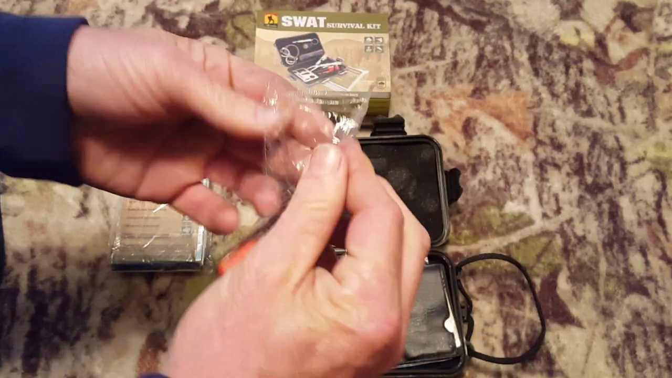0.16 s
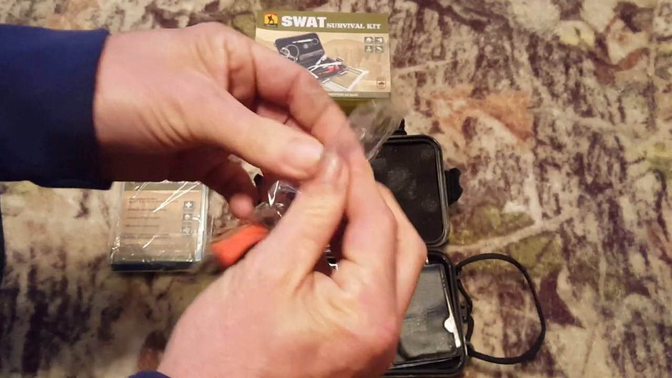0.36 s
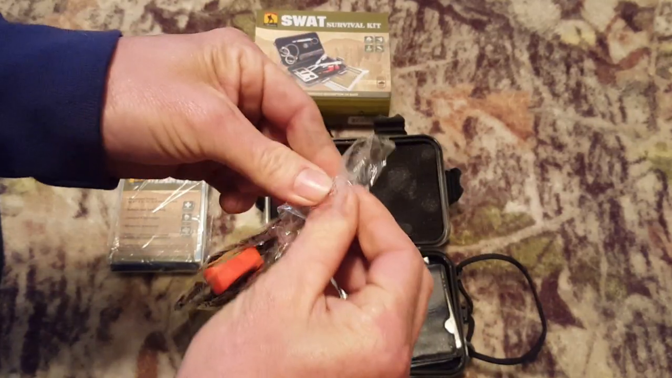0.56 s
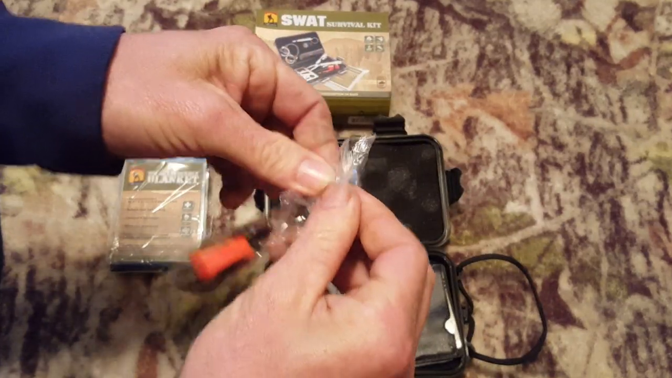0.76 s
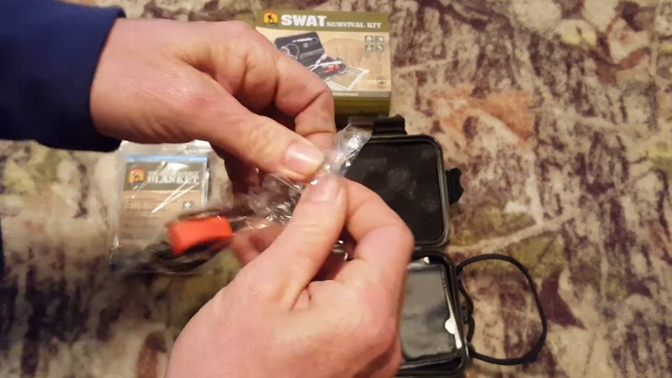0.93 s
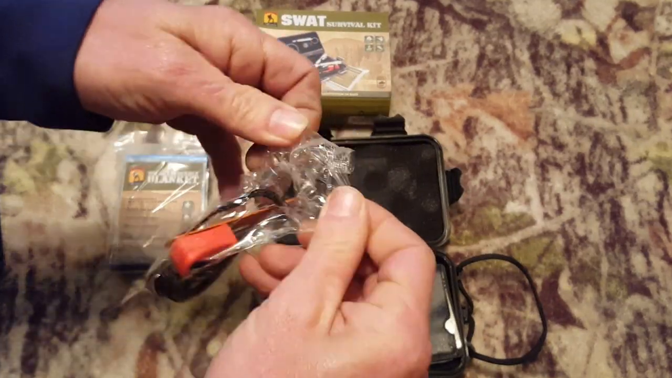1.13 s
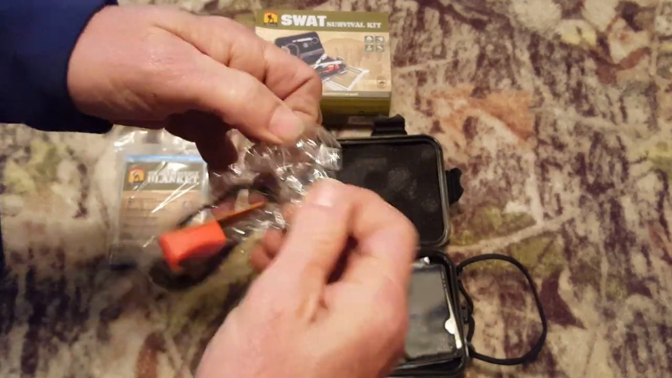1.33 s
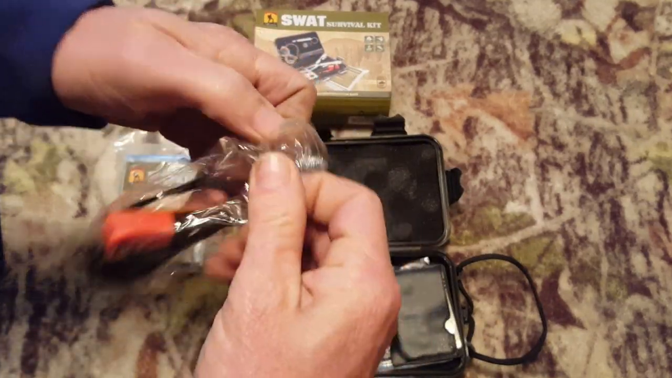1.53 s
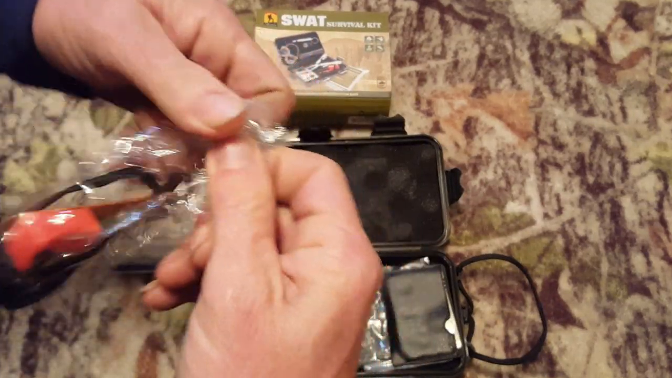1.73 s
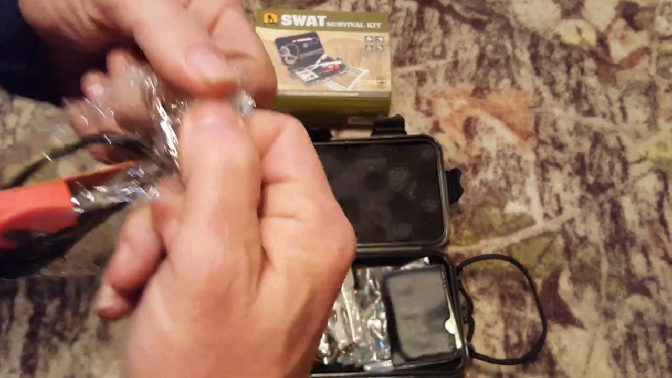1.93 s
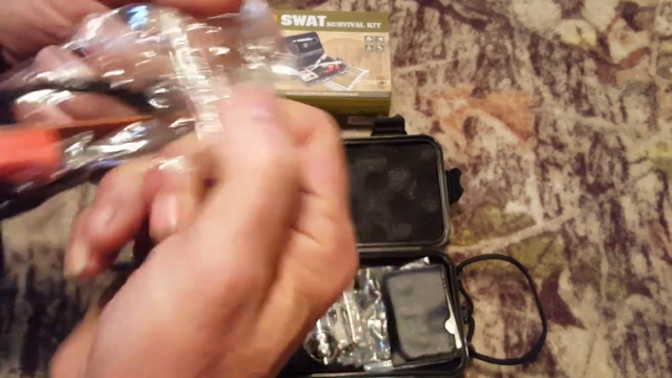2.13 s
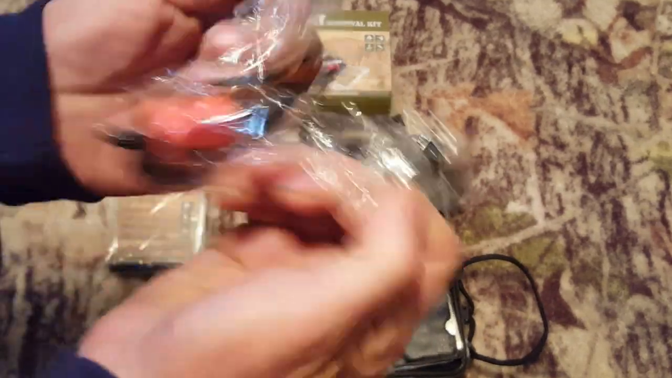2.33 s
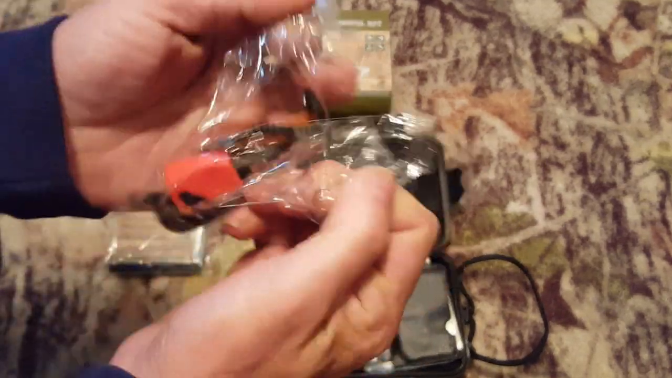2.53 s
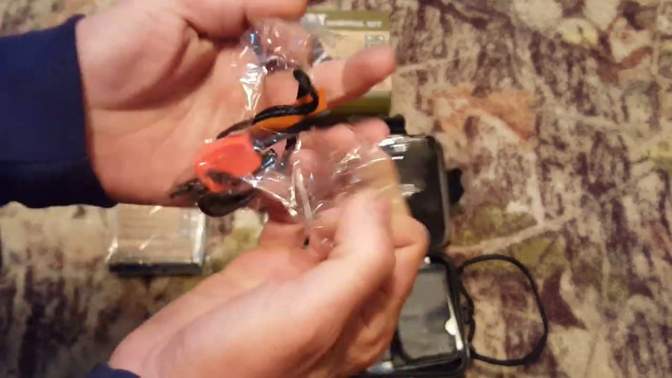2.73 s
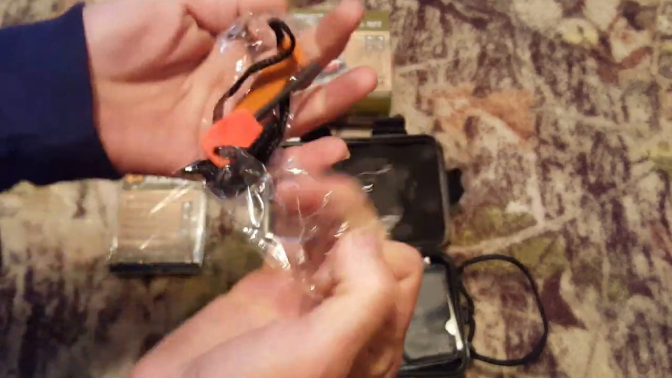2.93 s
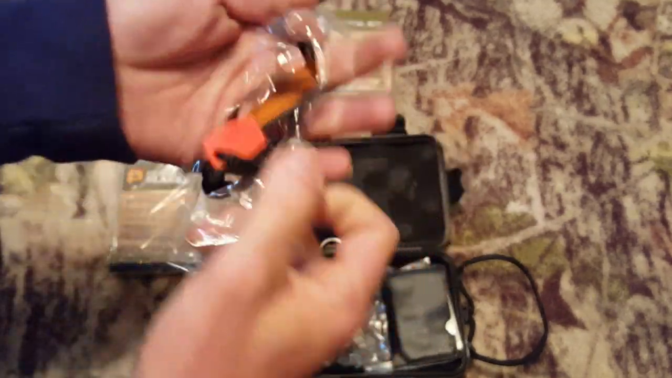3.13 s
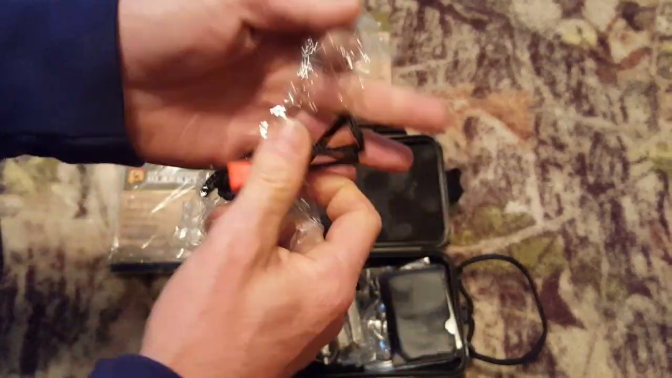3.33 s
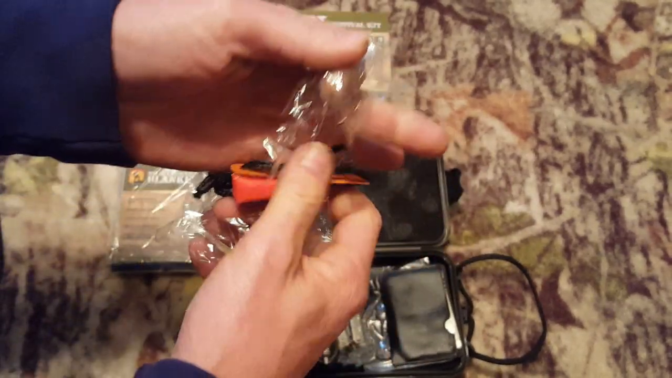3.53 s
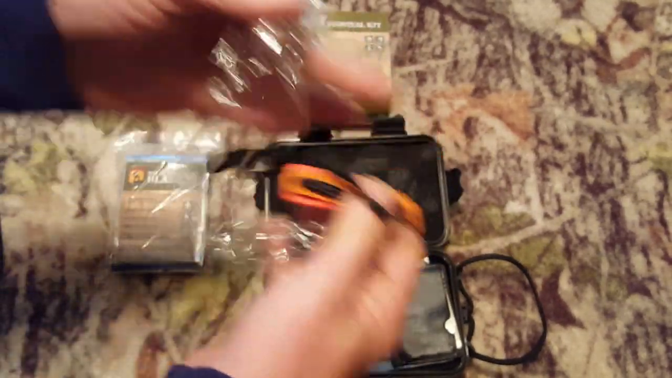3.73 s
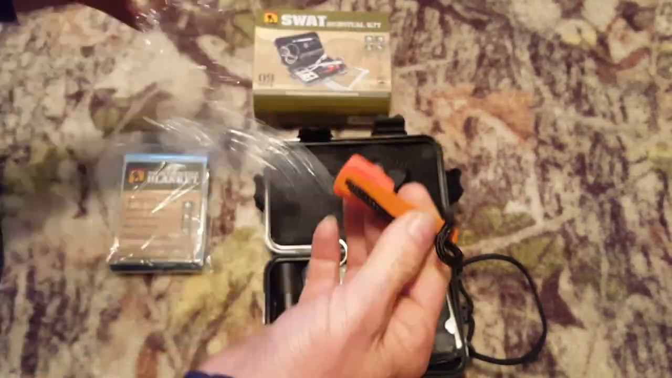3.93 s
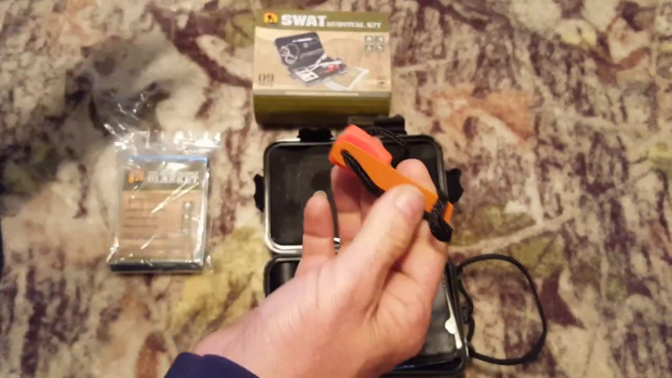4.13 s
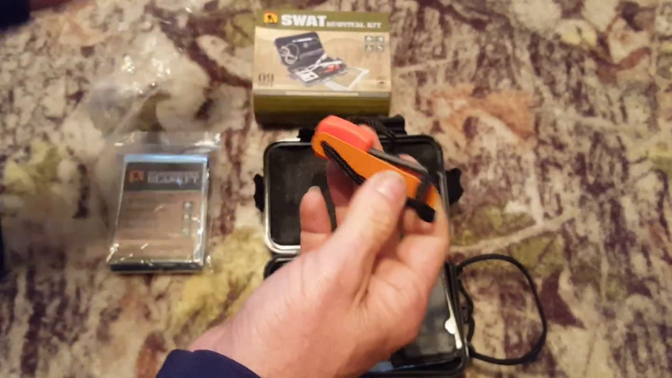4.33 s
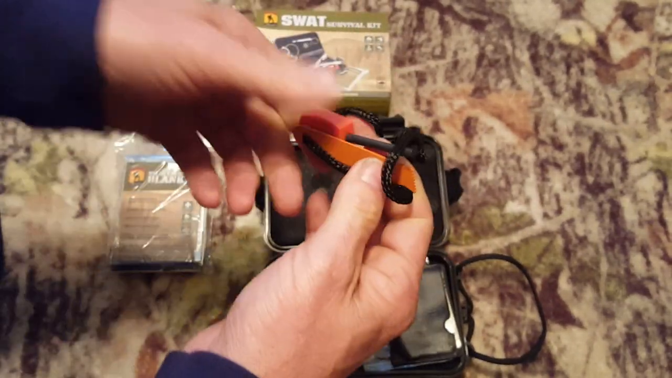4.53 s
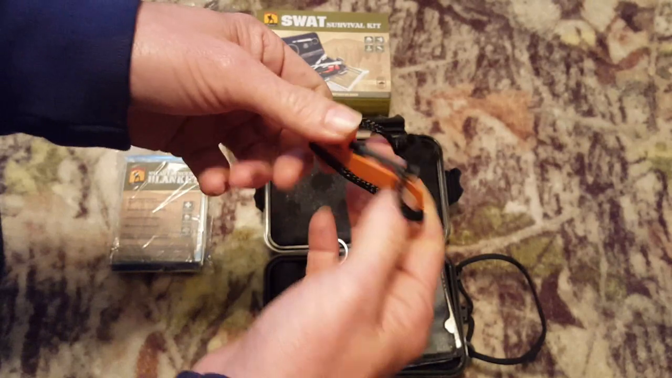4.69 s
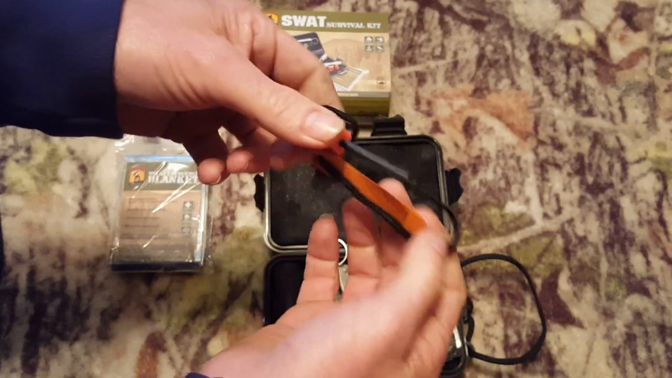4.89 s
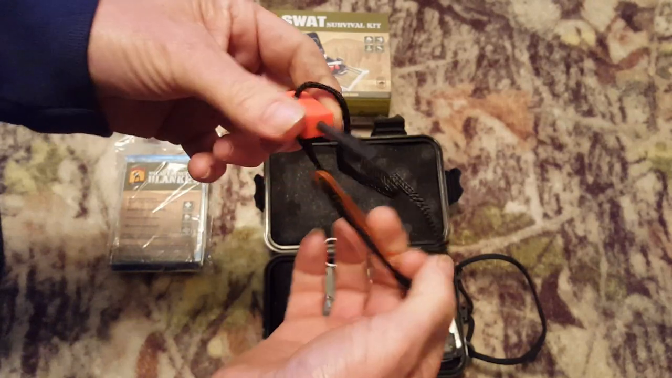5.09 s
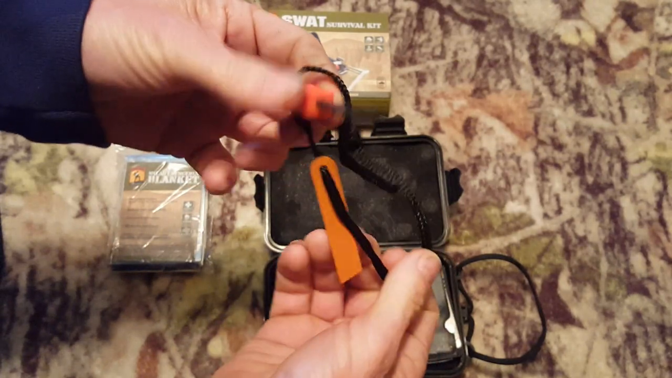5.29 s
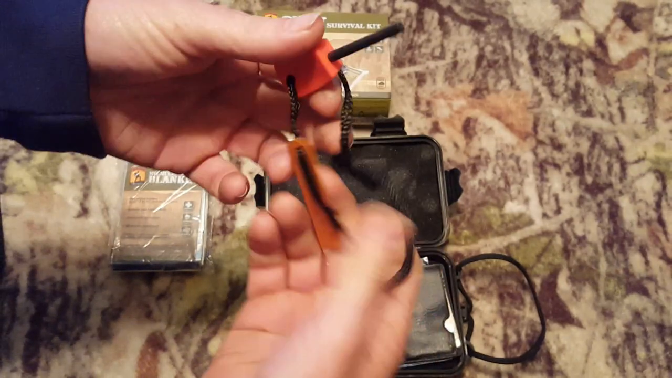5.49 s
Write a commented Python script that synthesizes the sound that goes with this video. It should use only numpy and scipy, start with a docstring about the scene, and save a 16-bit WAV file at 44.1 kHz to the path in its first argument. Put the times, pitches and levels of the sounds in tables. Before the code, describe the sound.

Two hands peel a crinkly clear wrapper from a small plastic tool with a cord, close to the microphone and slightly left. Bright irregular crackling comes in bursts with brief pauses, short sizzling peels and a hard knock past two seconds. Looser rustling follows, then, from about four seconds, quiet tapping, faint rubbing and a soft table bump in a small dry room.

```python
"""Thin clear plastic crackles at once, close by in a quiet room: two hands work a wrapper off a small corded tool.
Creases buckle in swarms of tiny ringing clicks and louder single snaps; film hisses as it slides on film.
Peeling film sizzles with a gliding pitch, and fingers knock on the contents as short damped resonances.
After four seconds the wrapper is dropped; light ticks, soft scuffs and a dull bump follow as the tool is turned.
Diffuse reflections and a faint filtered hiss make up the room."""
import sys
import numpy as np
from scipy import signal
from scipy.fft import rfft, irfft
from scipy.io import wavfile
from scipy.ndimage import uniform_filter1d

SR = 44100
rng = np.random.default_rng(int(sys.argv[2]) if len(sys.argv) > 2 else 0)


def put_to_file(sound):
    """Save the sound as 16-bit audio at rate SR, in the file named by the first command-line argument."""
    columns = np.atleast_2d(sound).T  # one column per channel
    safe = np.clip(columns, -1, 1)
    whole_steps = np.round(safe * 32767)
    wavfile.write(sys.argv[1], SR, whole_steps.astype(np.int16))


N = 244755
TIME = np.arange(N) / SR

# colour of the room's air and hiss: (frequency [Hz], level [dB])
AIR_COLOUR = [(18, -31), (30, 1.5), (53, -13), (118, -4), (266, -14), (426, -12.5), (988, -22.5),
              (1350, -20.5), (4530, -28), (8300, -30), (10200, -32), (14800, -30), (16000, -53)]
# colour of the room's reflections: (frequency [Hz], level [dB])
ROOM_COLOUR = [(100, 2), (500, -8), (2000, 4), (7000, -2), (10000, -6.5), (16000, -2)]
# dull bumps of an arm on the table: (time [s], peak level [dB], pitch [Hz])
BUMPS = [(.56, -54, 107), (3.915, -48, 106), (5.34, -53, 160), (5.358, -44.5, 106)]
# a fingertip or the cord scuffs the tool: (time [s], level [dB], decay [s], ring [Hz])
SCUFFS = [(4.459, -65, 0.016, 7400), (4.49, -57, 0.02, 3400), (4.681, -58.5, 0.027, 2500),
          (4.93, -74, 0.11, 8520), (5.092, -48, 0.022, 760), (5.26, -71.5, 0.078, 8040),
          (5.507, -72, .05, 8040)]
# light ticks of the tool, its cord and the settling wrapper, level before a shared gain:
# (time [s], level over 2 ms [dB], ring [Hz], share of the low thud [dB])
TICKS = [(4.0411, -37, 7800, -14), (4.0761, -39, 7200, -6), (4.0943, -43, 2400, -4.5),
         (4.1619, -40.5, 5670, -10), (4.2275, -45, 7200, -9), (4.2326, -49, 3100, 0),
         (4.2548, -51.5, 7800, -3), (4.3179, -42.5, 6100, -14), (4.3737, -44, 1960, -12),
         (4.3874, -50, 7700, -13), (4.4572, -38.5, 8100, -5.5), (4.4878, -41.5, 3480, -20),
         (4.6807, -44.5, 2680, -9.5), (4.7981, -54, 2130, -11.5), (5.0929, -44.5, 7600, -3.5),
         (5.2069, -59, 3970, -10.5), (5.3699, -56, 8750, -7.5), (5.5096, -56, 8960, -3)]
# fingers knock on the wrapped tool or jerk the film taut: (time [s], peak level [dB], resonance [Hz])
KNOCKS = [(.114, -24.5, 960), (1.27, -43, 252), (1.454, -32, 370), (1.679, -40, 298), (1.723, -18.5, 1410),
          (2.184, -26.5, 280), (2.314, -25, 300), (2.315, -27.5, 110), (2.367, -6.5, 1934),
          (2.385, -20.5, 1100), (3.576, -33.5, 330)]
# stretched film peels apart in fast slips, level before a shared gain and rates before they waver:
# (time [s], length [s], level [dB], first slip rate [Hz], last slip rate [Hz])
PEELS = [(0.825, 0.027, -39.5, 7080, 8170), (1.095, 0.018, -28.5, 10500, 13700),
         (1.102, 0.011, -34, 7370, 15000), (1.716, 0.053, -29, 6800, 7700),
         (1.741, 0.081, -29.5, 7600, 5840), (1.867, 0.039, -24.5, 6080, 8820),
         (2.017, 0.018, -32, 14000, 7650), (2.291, 0.0056, -25.5, 4630, 7360)]
# each squeeze or pull of the hands; slack film folds low, taut film is crisp:
# (time [s], hold [s], level [dB], swell over the hold [dB], slack [dB])
GRIPS = [(0.0, 0.13, -37, -7, 1.5), (0.22, .1, -32, 6.5, 0.5), (0.371, .1, -32.5, 0.5, 0),
         (0.499, 0.13, -35.5, -10, -3), (0.642, 0.064, -33.5, 0, -13), (0.816, 0.18, -40, -12, -11),
         (1.092, 0.066, -24.5, 5, -1.5), (1.304, 0.16, -36, 3, 0.5), (1.495, 0.045, -33.5, 2, 2),
         (1.561, .16, -32, 0.5, -2), (1.734, .115, -32.5, 10.5, -4.5), (1.862, 0.043, -27.5, 2, -2.5),
         (1.936, 0.061, -32.5, -14.5, -1.5), (2.043, 0.097, -23.5, 1.5, -2.5), (2.18, .075, -26.5, 7, -2),
         (2.284, 0.053, -21.5, -2, 3.5), (2.332, .048, -29, -3.5, 8.5), (2.41, 0.079, -37, 1, 1.5),
         (2.629, 0.12, -37.5, 2.5, 2.5), (2.796, 0.15, -36, 3.5, 10), (2.953, 0.11, -33.5, 4.5, 5.5),
         (3.091, 0.059, -44, 6, 13.5), (3.233, 0.059, -41.5, -4, 6.5), (3.298, 0.099, -37, -1, 0),
         (3.421, 0.017, -38.5, -3, 8), (3.459, 0.014, -42.5, -11, 9), (3.594, 0.082, -51, 22, 8),
         (3.689, 0.036, -39.5, 10, 8), (3.796, 0.088, -41.5, -13, 0.5), (3.9, 0.031, -32, -9, 1.5),
         (3.945, .035, -48.5, -3, 10)]
# the hands stop to change their hold: (time [s], length [s])
PAUSES = [(0.208, 0.0099), (0.903, .016), (1.222, 0.082), (2.171, 0.0063), (2.509, 0.029), (2.587, 0.016),
          (3.193, 0.025), (3.444, 0.012), (3.538, 0.062)]
# the loudest creases snapping through, level before a shared gain:
# (time [s], level over 2 ms [dB], ring [Hz], share of the low thud [dB])
SNAPS = [(0.0398, -28, 9000, -5), (0.082, -24.5, 7400, -30), (0.1157, -20, 1130, -3),
         (0.1574, -22.5, 8300, -17), (0.2273, -25.5, 5300, -11), (0.2542, -23.5, 9300, -22),
         (0.2751, -18, 8750, -15), (0.3139, -24, 7150, -13), (0.3821, -21, 5400, -22),
         (0.3959, -21, 2220, -10), (0.4682, -20, 6670, -5.5), (0.5474, -24.5, 2930, -20),
         (0.609, -25, 3540, -25), (0.668, -17.5, 7800, -20), (0.711, -23.5, 6070, -16),
         (0.762, -26, 5950, -13), (0.7985, -24.5, 3160, -16), (0.8217, -21, 8000, -19),
         (0.8875, -28, 3190, -3.5), (0.9203, -22.5, 6390, -5.5), (0.9375, -25, 6230, -9),
         (0.9863, -29, 2758, 0.5), (1.0178, -20.5, 6900, -15.5), (1.0278, -24.5, 2360, -13),
         (1.1346, -13, 3315, -9), (1.1662, -16.5, 7840, -5), (1.2448, -27.5, 9260, -27),
         (1.2698, -22.5, 5200, -3), (1.3061, -19, 9340, -30), (1.3181, -23.5, 2880, -21),
         (1.4002, -20, 9250, -14), (1.4657, -25, 3900, -8), (1.5066, -20, 8550, -7.5),
         (1.5127, -22, 1760, -12), (1.5327, -18, 8070, -11), (1.6139, -20, 2900, -12),
         (1.6798, -19.5, 6400, -9.5), (1.6953, -19, 7430, -17.5), (1.8122, -17.5, 7200, -10.5),
         (1.8368, -16.5, 5960, -18), (1.854, -23, 3520, -8.5), (1.9319, -26.5, 2820, -2.5),
         (1.9798, -20, 7760, -31), (2.012, -20, 8800, -10), (2.0349, -16.5, 2826, -11.5),
         (2.0639, -12.5, 8650, -10), (2.137, -22.5, 2700, -9), (2.1532, -17.5, 5900, -7),
         (2.1858, -15, 2900, 0), (2.1994, -15, 8250, -6), (2.2254, -16.5, 6940, -18.5),
         (2.239, -17.5, 2930, -5.5), (2.2786, -12, 7800, -15.5), (2.3137, -15.5, 6720, -6.5),
         (2.3187, -10, 8300, -13), (2.3695, -16.5, 2740, -1), (2.4094, -28, 7600, -23),
         (2.5459, -31, 2700, -7), (2.562, -28, 8600, -7), (2.5848, -27.5, 7700, -16),
         (2.7871, -25.5, 7800, -20), (2.8011, -27, 2100, 0), (2.8146, -23.5, 8770, -13),
         (2.849, -21, 1220, 2), (2.9113, -25, 7900, -9), (3.0084, -22, 2270, -0.5), (3.0818, -23, 1180, -4),
         (3.122, -22.5, 5670, -25), (3.1531, -19.5, 8600, -17), (3.1692, -25, 7300, -17),
         (3.2256, -26, 7600, -11), (3.2544, -26, 8400, -16), (3.3076, -24, 7800, -2.5),
         (3.3181, -21.5, 6800, -3.5), (3.3567, -21.5, 2900, -24), (3.373, -17.5, 9000, -16),
         (3.3961, -26.5, 2020, 0), (3.4305, -24, 5370, -4), (3.467, -25.5, 8400, -7),
         (3.4745, -24.5, 8200, -7.5), (3.5767, -23.5, 6440, -5), (3.6118, -28, 3860, -29),
         (3.641, -22.5, 2440, -13), (3.7698, -30, 2700, -1), (3.8117, -32, 8300, -22),
         (3.832, -22.5, 3690, -6), (3.9807, -26, 7600, -9)]
# sizes of buckle, from small facets through creases and large folds to flapping:
# (lowest frequency [Hz], highest frequency [Hz])
SIZE_BANDS = [(3500, 17000), (1400, 3500), (500, 1400), (55, 500)]
# how each size answers a grip: (level [dB], share of the grip's level [ratio], share of its slack [ratio])
SIZES = [(0, 0.97, 0.0), (-4.5, 0.86, 0.39), (-13.5, 0.98, 0.96), (-21, 0.7, 0.85)]
# colour of the crinkling film: (frequency [Hz], level [dB])
FILM_COLOUR = [(35, -49), (60, -19.5), (107, -15), (322, -8), (379, -8), (576, -9), (762, -5), (1810, -6.5),
               (1980, -4), (4180, -2), (7850, 1), (8820, -1), (10100, -9), (14400, -7.5), (15800, -17)]
# how strongly the left-right difference sounds: (frequency [Hz], level [dB])
SPREAD = [(100, -8), (1000, -5), (3500, -3.5), (4800, -1), (6300, -31.5), (8000, -2.5), (9500, -3),
          (12500, -1.5), (15500, -11)]
# how far left is louder than right: (frequency [Hz], left over right [dB])
LEFT_LEAD = [(60, 7), (110, 2), (200, 3.5), (380, 4), (700, 2.5), (1290, 3.5), (2380, 1.5), (4400, -1),
             (8120, 5.5), (15000, 7)]
# where the hands hold the wrapper, before centring and scaling: (time [s], left over right [dB])
HANDS = [(0.0, 4.5), (0.76, 2), (1.03, 6), (1.51, 4), (1.96, 7), (2.33, 0.5), (2.75, 4), (3.53, 4.5),
         (4.1, 3.5)]

AIR_DB = -68
CUTOFF_HZ = 16000
RIGHT_LAG_MS, RIGHT_LAG_TOP_HZ = 0.14, 4340
# the film gives at once and goes on creaking after each grip
ATTACK_S, RELEASE_DB_PER_S, USUAL_GRIP_DB = .007, 280.0, -32.5
# it stirs between grips, and unfolds once dropped
HELD_DB, LET_GO_S, SETTLE_DB_PER_S = -43, 3.98, 138
PAUSE_DB, PAUSE_FADE_S = -8.0, 0.012   # how far the crinkle sinks in a pause, and how fast
CROWDING = .8   # a harder grip buckles more creases a second, by this power of its strength
# lesser snaps: rate, level over the grip and its scatter, share of the grip's level they follow
SNAPS_PER_S, SNAP_OVER_DB, SNAP_SCATTER_DB, SNAP_FOLLOWS = 40.0, 3.0, 2.5, .75
# what they ring at: two centres, the share of long creases, and the scatter in octaves
SHORT_CREASE_HZ, LONG_CREASE_HZ, LONG_SHARE, CREASE_SCATTER_OCT = 7600, 2900, 0.24, 0.34
SNAP_LOW_DB = 1.5   # their low share, over the large folds' level against the small facets'


def from_db(db):
    """Turn decibels into a plain gain."""
    return 10 ** (np.asarray(db) / 20)


def unit_energy(x):
    """Scale a sound so that its squares add up to 1."""
    return x / np.sqrt(np.sum(x ** 2) + 1e-20)


def at_hz(points, hz):
    """Read a colour table between its points, on a logarithmic frequency scale."""
    table = np.array(points)
    return np.interp(np.log(hz + 1), np.log(table[:, 0]), table[:, 1])


def cut(x, hz, kind, order=2):
    """Keep only the low, high or band part of a sound."""
    sos = signal.butter(order, hz, kind, fs=SR, output="sos")
    return signal.sosfilt(sos, x + 1e-18)


def resonate(x, hz, q):
    """A resonance of gain 1 and width hz / q."""
    hz = min(hz, .45 * SR)
    q = max(q, hz / (.4 * SR))
    return signal.lfilter(*signal.iirpeak(hz, q, fs=SR), x + 1e-18)


def colour(x, points, size=2048):
    """Causal (minimum-phase) filter that follows a spectrum in dB."""
    gains = from_db(at_hz(points, np.fft.rfftfreq(size, 1 / SR)))
    cepstrum = irfft(np.log(gains))
    # folding the cepstrum forward in time puts the response after its cause
    cepstrum[1:size // 2] *= 2
    cepstrum[size // 2 + 1:] = 0
    response = irfft(np.exp(rfft(cepstrum)))
    return signal.oaconvolve(x, response[None], axes=-1)[:, :x.shape[-1]]


def drift(per_s):
    """Slow random wandering around 0, through per_s new values a second."""
    knots = rng.standard_normal(8192)
    return np.interp(TIME * per_s, np.arange(len(knots)), knots)


def add(out, s, sound):
    """Mix a short sound into out at time s, cutting off what runs past the end."""
    start = max(round(s * SR), 0)
    out[:, start:start + sound.shape[-1]] += sound[:, :max(N - start, 0)]


def room_tone(side_db=-1.5):
    """Still air and a faint hiss: coloured noise, partly different on left and right."""
    air = colour(rng.standard_normal((2, N)), AIR_COLOUR)
    mid, side = from_db(AIR_DB) * air / air.std()
    return mid + from_db(side_db) * side * [[1], [-1]]


def room(mid_side, t60, wet_db, build_s=0.0013):
    """Diffuse reflections from the table and furnished room: noise that builds fast and decays 60 dB in t60."""
    t = np.arange(SR // 2) / SR
    tail = rng.standard_normal((2, len(t))) * from_db(-60 * t / t60) * (1 - np.exp(-t / build_s))
    tail = colour(np.array([unit_energy(row) for row in tail]), ROOM_COLOUR)
    return from_db(wet_db) * signal.oaconvolve(mid_side[:1], tail, axes=-1)[:, :N]


def bumps(swell_s=0.02):
    """A soft push swells into one low note of the table and dies."""
    out, t = np.zeros((2, N)), np.arange(SR // 4) / SR
    for s, db, hz in BUMPS:
        swell = (t / swell_s * np.exp(1 - t / swell_s)) ** 2
        add(out, s, from_db(db) * swell * np.sin(2 * np.pi * hz * t) * [[1], [0]])
    return out


def scuffs(rough_db=6.5, q=3.4, rasp=0.84):
    """Brief rough rubbing that rings the tool and dies away."""
    rough_noise = rng.standard_normal((2, N)) * from_db(rough_db * drift(400))
    rub = colour(rough_noise, FILM_COLOUR)
    out = 0
    for s, db, decay, hz in SCUFFS:
        scuff = unit_energy(resonate(rub, hz, q)) + rasp * unit_energy(rub)
        fade = (TIME > s) * np.exp(-abs(TIME - s) / decay)
        out = out + from_db(db) * fade * scuff / scuff.std()
    return out


def knocks(q=1.0, contact_s=0.0084, scuff=0.056, side_db=-0.5):
    """A brief scuffing push into a heavily damped body, louder on the left."""
    out, t = np.zeros((2, N)), np.arange(4096) / SR
    noises = rng.standard_normal((len(KNOCKS), 2, len(t)))
    for (s, db, hz), noise in zip(KNOCKS, noises):
        push = (t == 0) + scuff * noise * np.exp(-t / contact_s)
        knock = cut(resonate(push, hz, q), 2 * hz, "low")
        add(out, s, from_db(db) * knock / abs(knock).max() * from_db([[0], [side_db]]))
    return out


def peels(gain_db=-2.0, wander=0.17, rough=0.96):
    """Stick and slip along a running edge; its rate wavers and glides with the pull."""
    out = np.zeros((2, N))
    for s, length, db, first_hz, last_hz in PEELS:
        progress = np.linspace(0, 1, max(int(length * SR), 8))
        size = len(progress)
        rate = np.geomspace(first_hz, last_hz, size) * np.exp(wander * drift(900)[:size])
        phase = 2 * np.pi * np.cumsum(rate) / SR
        swell = np.sqrt(2 * abs(np.sin(np.pi * progress))) * (1 + rough * drift(1500)[:size])
        facing = .5 * drift(700)[:size]   # the edge turns towards one side, then the other
        sizzle = np.array([np.sin(phase), facing * np.cos(phase)])
        add(out, s, from_db(db + gain_db) * swell * sizzle)
    return out


def stillness():
    """Gain of the crinkle: it sinks in each pause of the hands."""
    still = 0
    for s, length in PAUSES:
        inside = np.minimum(TIME - s, s + length - TIME)
        still = still + np.clip(inside / PAUSE_FADE_S + .5, 0, 1)
    return from_db(PAUSE_DB * still)


def effort(gain_db, follows, slack_share):
    """Strength of one size of buckle: each grip rises, holds and dies away, over the stir of the held film."""
    def level(db):
        return from_db(USUAL_GRIP_DB + gain_db + follows * (db - USUAL_GRIP_DB))
    power = level(HELD_DB - SETTLE_DB_PER_S * np.maximum(TIME - LET_GO_S, 0)) ** 2
    for s, hold, db, swell_db, slack_db in GRIPS:
        near = slice(max(int(s * SR), 0), int((s + hold + .5) * SR))
        t = TIME[near] - s
        swelling_db = swell_db * (np.minimum(t / hold, 1) - .5)
        held_db = db + swelling_db - RELEASE_DB_PER_S * np.maximum(t - hold, 0)
        rise = np.clip(t / ATTACK_S, 0, 1)
        power[near] += (rise * level(held_db) * from_db(slack_share * slack_db)) ** 2
    return np.sqrt(power) * stillness()


def clicks_of(table, gain_db, slip_s, grit, q, crack, echo_db):
    """A sudden snap with a gritty slip rings a facet and thuds the sheet; the hand throws it back soon after."""
    out, t = np.zeros((2, N)), np.arange(512) / SR
    slips = rng.standard_normal((len(table), 2, len(t)))
    delays = rng.uniform(0.00087, .0025, len(table))
    for (s, db, hz, low_db), noise, delay in zip(table, slips, delays):
        echo = (t > delay) * np.exp(-abs(t - delay) / (2 * slip_s))
        shape = np.exp(-t / slip_s) + from_db(echo_db) * echo
        snap = np.array([t == 0, np.zeros(len(t))]) * np.sign(noise[0, 0])
        slip = colour(snap + grit * noise * shape, FILM_COLOUR, size=1024)
        ring = unit_energy(resonate(slip, hz, q)) + crack * unit_energy(cut(slip, 1850, "high"))
        thud = unit_energy(cut(slip, 2000, "low"))
        share = np.clip(from_db(low_db), 0, .9)
        # the sheet as a whole swings against the facet
        click = np.sqrt(1 - share ** 2) * unit_energy(ring) - share * thud
        # energy worth a level of 1 over 2 ms
        click = np.array([unit_energy(row) for row in click]) * np.sqrt(.002 * SR)
        add(out, s, from_db(db + gain_db) * click)
    return out


def lesser_snaps(count=500):
    """Creases give way at random, as hard as the film is worked and duller where slack; rows as in SNAPS."""
    wait, kind = rng.random((count, 2)).T
    size, pitch, low = rng.standard_normal((count, 3)).T
    s = np.cumsum(-np.log(1 - wait)) / SNAPS_PER_S
    facets, _, folds, _ = (20 * np.log10(np.interp(s, TIME, effort(*row))) for row in SIZES)
    grip_db = USUAL_GRIP_DB + SNAP_FOLLOWS * (facets - USUAL_GRIP_DB)
    db = grip_db + SNAP_OVER_DB + SNAP_SCATTER_DB * size
    centre_hz = np.where(kind < LONG_SHARE, LONG_CREASE_HZ, SHORT_CREASE_HZ)
    hz = centre_hz * 2 ** (CREASE_SCATTER_OCT * pitch)
    low_db = folds - facets + SNAP_LOW_DB + 2 * SNAP_SCATTER_DB * low
    return np.transpose([s, db, hz, low_db])[s < LET_GO_S]


def swarm(busy, per_s, size_db, clump_db, q, crack, count=22):
    """Tiny creases buckle in clumps; each clicks and rings its own facet of film. Rows: mid, side."""
    chance = busy * per_s * from_db(clump_db * drift(130)) / SR
    born = rng.random(N) < chance
    sizes = born * from_db(size_db * np.minimum(rng.exponential(1, N), 2)) * rng.choice([-1, 1], N)
    clicks = sizes * np.array([np.ones(N), rng.choice([-1, 1], N)])
    facet = rng.integers(0, count, N)
    rings = 0
    for k, hz in enumerate(np.geomspace(700, 14500, count)):
        rings = rings + resonate(clicks * (facet == k), hz, q)
    return colour(unit_energy(rings) + crack * unit_energy(clicks), FILM_COLOUR)


def steady(x, window_s):
    """Even out the level over the span of a finger movement; single clicks still stand out."""
    size = int(window_s * SR / 2)
    power = uniform_filter1d(uniform_filter1d(x[0] ** 2, 2 * size), size)
    return x / np.sqrt(np.maximum(power, 0) + np.mean(x[0] ** 2) / 1000)


def crinkle(slide_db=-4.5, jerk_db=0.7, patchy_db=0.83):
    """The swarm and the hiss of film on film; fingers move in jerks, and each size of buckle comes and goes."""
    busy = np.maximum(effort(*SIZES[0]) / from_db(USUAL_GRIP_DB), .5) ** CROWDING
    clicks = swarm(busy, per_s=750, size_db=6.0, clump_db=5.5, q=3.2, crack=1.0)
    slide = colour(rng.standard_normal((2, N)), FILM_COLOUR)
    film = unit_energy(clicks) + from_db(slide_db) * unit_energy(slide)
    out, jerks_db = 0, jerk_db * drift(55)
    for band, size in zip(SIZE_BANDS, SIZES):
        buckles = steady(cut(film, band, "band", order=3), window_s=.04)
        out = out + effort(*size) * from_db(jerks_db + patchy_db * drift(70)) * buckles
    return out


def to_left_right(mid_side, lean_share=0.64):
    """Mid and side become left and right; the lower range reaches the right a little late."""
    mid, side = mid_side[0], colour(mid_side[1:], SPREAD)[0]
    left, right = mid + side, mid - side
    lowpass = signal.butter(12, RIGHT_LAG_TOP_HZ, fs=SR, output="sos")
    low = signal.sosfiltfilt(lowpass, right)
    right = right - low + np.interp(TIME - RIGHT_LAG_MS / 1000, TIME, low)
    # left is louder in most ranges, and the balance shifts as the hands move
    left = colour(left[None], [(hz, db / 2) for hz, db in LEFT_LEAD])
    right = colour(right[None], [(hz, -db / 2) for hz, db in LEFT_LEAD])
    s, pan_db = np.transpose(HANDS)
    lean = from_db(lean_share * np.interp(TIME, s, pan_db - pan_db.mean()) / 2)
    return np.vstack([left * lean, right / lean])


def scene():
    """Wrapper and tool with their reflections, then the bumps and the quiet room."""
    tool = scuffs() + clicks_of(TICKS, gain_db=-0.5, slip_s=0.00039, grit=0.49, q=3.8, crack=0.68, echo_db=-7.5)
    film = knocks() + peels() + crinkle()
    creases = np.vstack([SNAPS, lesser_snaps()])
    snaps = clicks_of(creases, gain_db=-2.0, slip_s=0.0003, grit=0.39, q=4.5, crack=0.91, echo_db=-7.5)
    wrapper = film + snaps
    reflections = room(wrapper, t60=0.16, wet_db=-9.0) + room(tool, t60=0.23, wet_db=-6.0)
    return to_left_right(wrapper + tool + bumps() + reflections) + room_tone()


def record(dry):
    """The highest peaks are rounded and the top of the treble is cut."""
    rounded = .8 * np.tanh(dry / .8)
    lowpass = signal.ellip(10, .3, 80, CUTOFF_HZ, fs=SR, output="sos")
    return signal.sosfilt(lowpass, rounded)


dry = scene()
out = record(dry)
put_to_file(out)
```